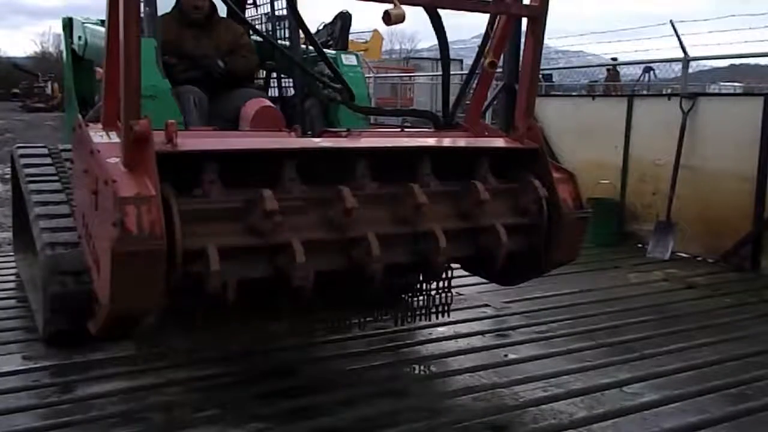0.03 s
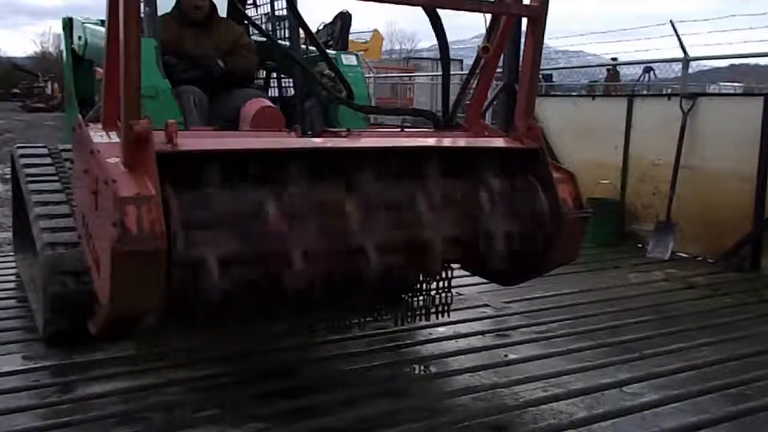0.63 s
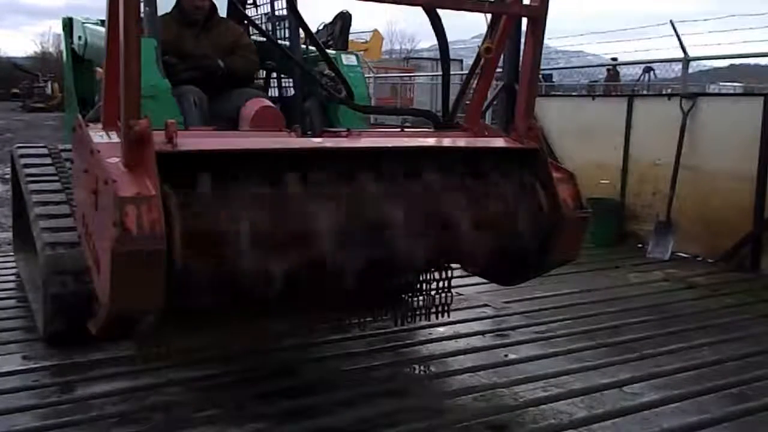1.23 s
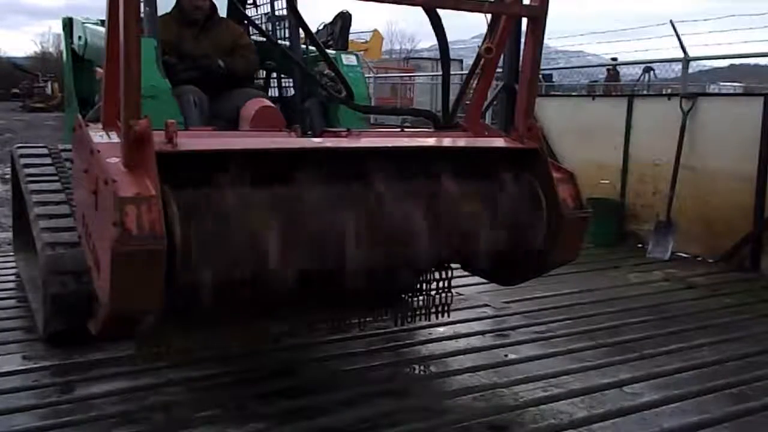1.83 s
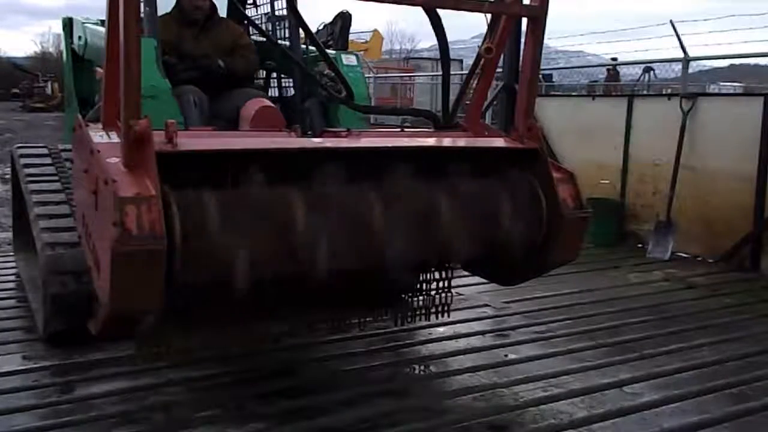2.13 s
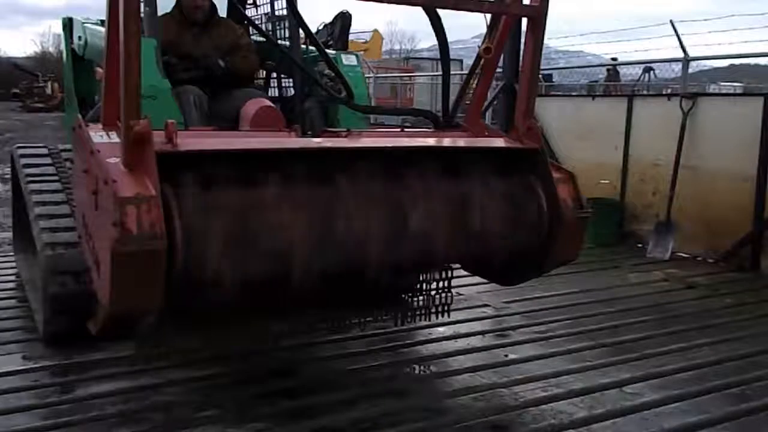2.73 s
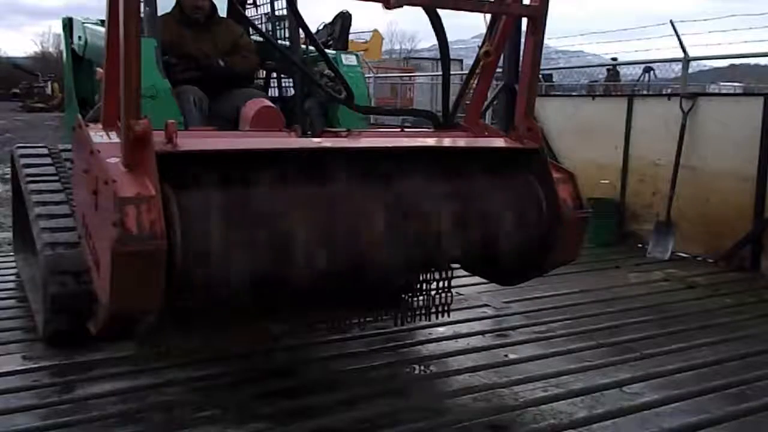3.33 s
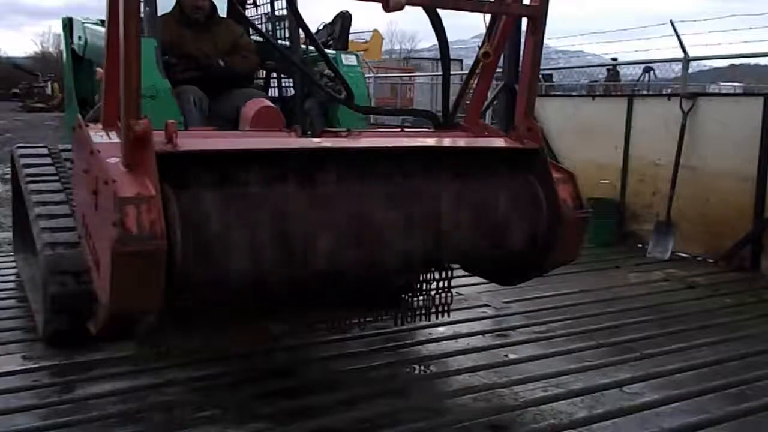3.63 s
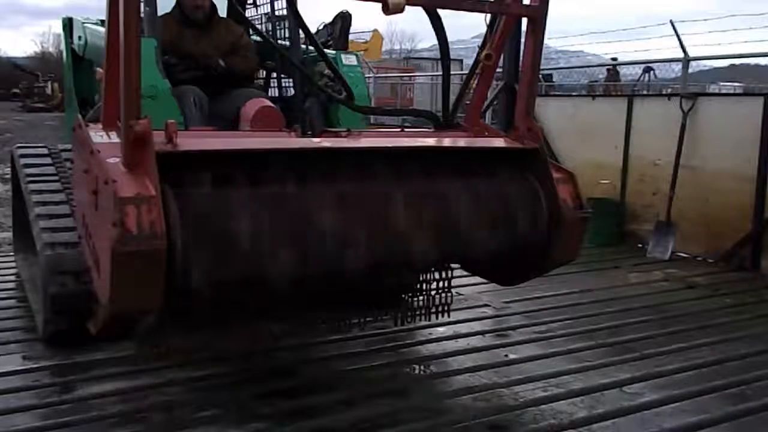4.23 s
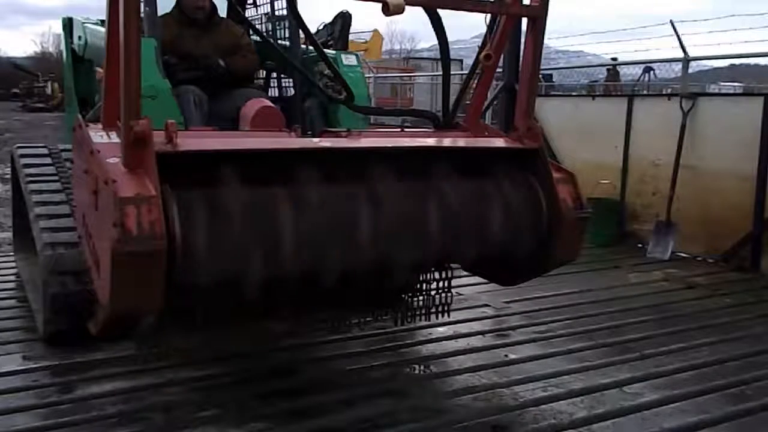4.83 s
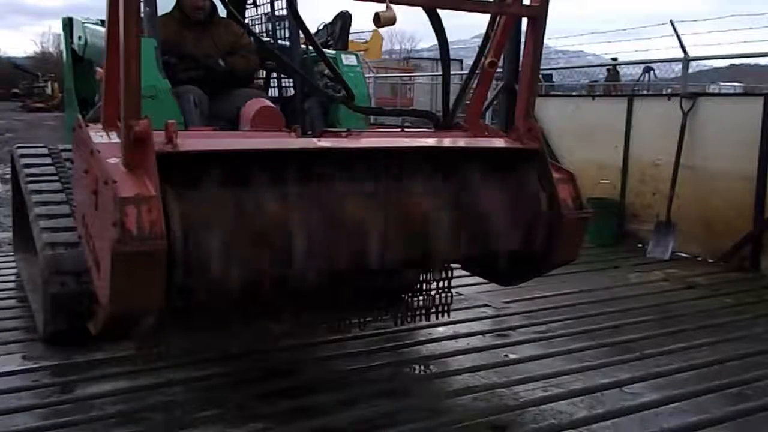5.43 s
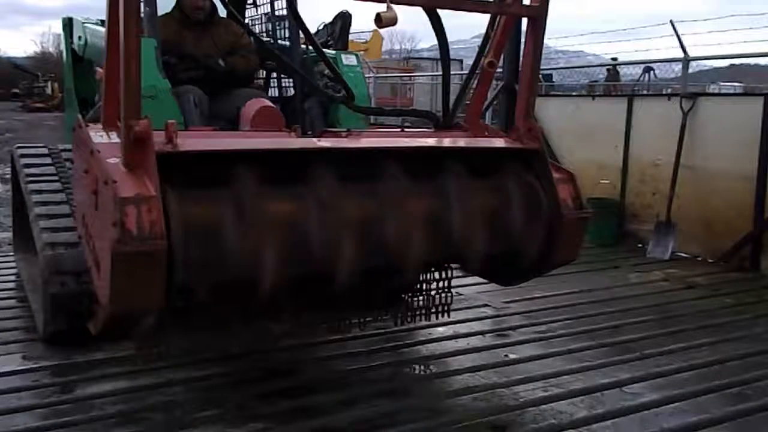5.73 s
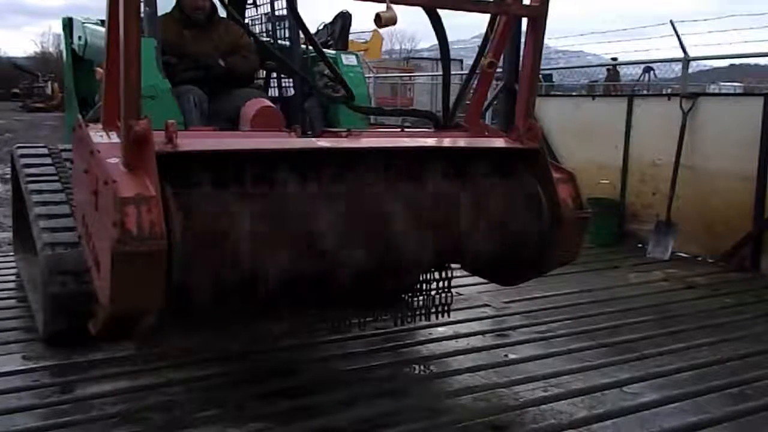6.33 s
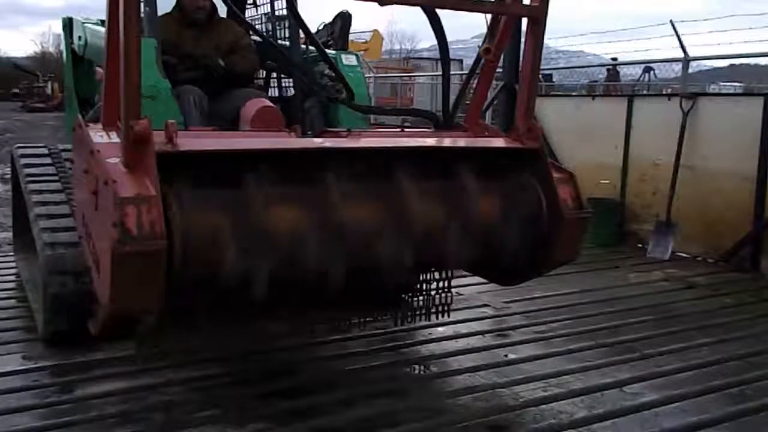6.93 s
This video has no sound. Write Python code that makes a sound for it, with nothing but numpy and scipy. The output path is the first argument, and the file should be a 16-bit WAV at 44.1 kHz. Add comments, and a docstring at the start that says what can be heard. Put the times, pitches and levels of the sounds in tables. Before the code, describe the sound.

A tracked machine's diesel runs continuously with metallic clatter and pump whine, an early hissing squeal, and slight pitch dips under load.

```python
"""A four-cylinder diesel on a tracked carrier runs near 1850 rpm and spins up a mulcher drum.
Under load the speed sags and the exhaust beats evenly; unloaded, the engine runs lumpy and knocks.
Injection clatter repeats every engine cycle and rings the steel covers, over a rush of air and oil.
The hydraulic pump sings along with the crank and groans as the pressure peaks. Early on, the drum's
oil valve spurts, squeals and rings its pipes. A faint sizzle sits on top of the whole sound."""
import sys
import numpy as np
from scipy import signal
from scipy.fft import rfft, irfft, next_fast_len
from scipy.io import wavfile
from scipy.ndimage import map_coordinates

SR = 44100
rng = np.random.default_rng(int(sys.argv[2]) if len(sys.argv) > 2 else 0)


def materialize(psi):
    """Save the field psi as 16-bit PCM at rate SR to the path in sys.argv[1].

    A 1-D psi becomes a single channel; in a 2-D psi each row is a channel.
    """
    bounded = np.clip(np.atleast_2d(psi).T, -1, 1)
    quanta = np.round(bounded * 32767).astype(np.int16)
    wavfile.write(sys.argv[1], SR, quanta)


N = 317079
TIME = np.arange(N) / SR

# knock of each cylinder, in firing order: (relative level [dB])
CYLINDER_KNOCKS = [-8, -1.5, -5, 2]
# the pump groans as oil pressure peaks against the drum: (time [s], length [s], whine boost [dB])
PUMP_GROANS = [(0.423, 0.045, 9), (6.762, 0.03, 11.5)]
# oil spurts through the closing valve, each brighter than the last:
# (time [s], half length [s], centre [Hz], width [Hz], level [dB])
OIL_SPURTS = [(.3, .03, 3200, 1500, -26.5), (.365, .026, 3600, 1400, -28.5),
              (.408, .032, 3700, 1800, -27.5)]


def undb(db):
    """Decibels to gain."""
    return np.exp(np.asarray(db) * np.log(10) / 20)


def walk(rate):
    """Smooth random drift of unit spread, changing about rate times a second."""
    size = next_fast_len(N, real=True)
    hz = np.fft.rfftfreq(size, 1 / SR)
    drift = irfft(rfft(rng.standard_normal(size)) * np.exp(-(hz / rate) ** 2), size)[:N]
    return drift / drift.std()


def filtered(x, response):
    """Pass a sound through a response given as a function of frequency."""
    size = next_fast_len(N + SR // 2)
    hz = np.fft.rfftfreq(size, 1 / SR) + 1e-3
    return irfft(rfft(x, size) * response(hz), size)[:N]


def on_log_axis(hz, points_hz, values):
    """Join spectrum points by straight lines on a log-frequency axis."""
    return np.interp(np.log(hz), np.log(points_hz), values)


def resonance(hz, centre_hz, width_hz):
    """Response of one resonance, gain 1 at its centre."""
    return 1 / (1 + 1j * (hz - centre_hz ** 2 / hz) / width_hz)


def hiss(response):
    """Noise of rms 1 coloured by a response."""
    noise = filtered(rng.standard_normal(N), response)
    return noise / noise.std()


def unit_treble(x):
    """Scale a sound so that its 1-6 kHz band has rms 1."""
    return x / filtered(x, lambda hz: (hz > 1000) & (hz < 6000)).std()


def hydraulic_load():
    """The drum is driven, nears its speed, runs free and is driven again."""
    # load changes: (time [s], ramp [s], new load [0 free, 1 full])
    load_changes = [(.275, .215, 1), (2.836, 1.183, .49), (5.238, .243, 0), (6.557, .29, 1)]
    load, before = np.zeros(N), 0
    for start, ramp, after in load_changes:
        load += (after - before) * np.clip((TIME - start) / ramp, 0, 1)
        before = after
    return load


def governor(load, free_hz=64.013, droop_hz=3.52, swings_per_s=1.72, settle_s=.135, fuel_lag_s=.037):
    """Firing rate droops with load and swings after each change; fuelling follows a little late."""
    idle_fuel, extra_fuel_per_hz = .031, .078  # steady full load takes a fuelling of 1
    swing = np.exp(-TIME / settle_s) * np.sin(2 * np.pi * swings_per_s * TIME)
    sag_hz = 5.78 * signal.fftconvolve(np.gradient(load), swing)[:N]
    firing_hz = free_hz - droop_hz * load ** 2 - sag_hz
    fuel = idle_fuel + (1 - idle_fuel) * load + extra_fuel_per_hz * load ** 2 * sag_hz
    return firing_hz, np.interp(TIME - fuel_lag_s, TIME, fuel)


def load_weights(fuel):
    """Crossfade between the full-load, half-load and free-running character."""
    balance = 2 * np.maximum(fuel, 0) - 1
    return np.maximum([balance, 1 - np.abs(balance), -balance], 0)


def sizzle(fuel, free_db=-56.2, loaded_change_db=-3.5, spurt_boost_db=3.5, flicker_db=1.5):
    """A thin, flickering sizzle high above the clatter, a little stronger while the valve spurts."""
    # noise bands: (centre [Hz], half width [Hz], relative level [dB])
    bands = [(7750, 500, 0), (9050, 330, -7)]
    noise = hiss(lambda hz: sum(undb(db) * np.exp(-((hz - centre) / half) ** 2)
                                for centre, half, db in bands))
    spurting = sum(np.exp(-((TIME - s) / half) ** 2) for s, half, *_ in OIL_SPURTS)
    level_db = free_db + loaded_change_db * np.minimum(fuel, 1) + spurt_boost_db * spurting
    return noise * undb(level_db + flicker_db * walk(60))


def oil_valve(squeal_hz=2945, squeal_db=-36, flow_db=-32, top_hz=5200, wander_rad=.59):
    """Oil squeezing through a narrow gap squeals and spurts, then rings the pipes as the drum spins up."""
    # resonances of the valve and its pipes: (centre [Hz], width [Hz], relative level [dB])
    pipe_modes = [(3265, 40, -1), (3470, 46, 0), (2190, 66, -5.5), (4400, 1200, -14)]
    start_s, end_s, spin_up_s = .33, .44, 2.1
    rise_db_per_s, release_db_per_s = 49, 301
    before, after = np.maximum(start_s - TIME, 0), np.maximum(TIME - end_s, 0)
    envelope = undb(squeal_db - rise_db_per_s * before - release_db_per_s * after)
    squeal = envelope * np.sqrt(2) * np.sin(2 * np.pi * squeal_hz * TIME + wander_rad * walk(30))
    muffle = lambda hz: 1 / (1 + (hz / top_hz) ** 20)
    spurts = np.zeros(N)
    for s, half, centre, width, db in OIL_SPURTS:
        burst = undb(db) * np.exp(-((TIME - s) / half) ** 2)
        spurts += burst * hiss(lambda hz: resonance(hz, centre, width) * muffle(hz))
    pipe_power = lambda hz: sum(np.abs(undb(db) * resonance(hz, centre, width)) ** 2
                                for centre, width, db in pipe_modes)
    pipes = hiss(lambda hz: muffle(hz) * np.sqrt(pipe_power(hz)))
    flow = np.interp(TIME, [start_s, end_s, end_s + spin_up_s], [0, 1, 0])
    return squeal + spurts + undb(flow_db) * flow * pipes


def pump(cycle, firing_hz, weights, strokes_per_cycle=27.26, groan_edge_s=.01, wander_rad=.18):
    """Pressure ripple of the engine-driven pump: a whine, its octave and a thin tone two octaves up."""
    # the tones slide through the machine's resonances: (firing rate [Hz], whine [dB], octave [dB])
    pump_response = [(58.7, -41, -36), (59.6, -30.5, -34), (60.5, -29.5, -30.8), (61, -31.5, -38),
                     (61.55, -24.5, -45), (62.1, -27.5, -40), (62.5, -37, -39), (63, -27.3, -40),
                     (64, -26.2, -34), (64.8, -31, -25.5)]
    # the thin top tone: (full load [dB], half load [dB], running free [dB])
    overtone_db = [-52, -45, -40]
    whine_flutter_db, octave_flutter_db = 1.5, 1.0
    rates_hz, *levels = np.transpose(pump_response)
    whine_db, octave_db = (np.interp(firing_hz, rates_hz, db) for db in levels)
    groan_db = sum(np.interp(TIME - s, [-groan_edge_s, 0, length, length + groan_edge_s], [0, db, db, 0])
                   for s, length, db in PUMP_GROANS)
    phase = 2 * np.pi * strokes_per_cycle * cycle + wander_rad * walk(35)
    whine = undb(whine_db + groan_db + whine_flutter_db * walk(33)) * np.sin(phase)
    octave = undb(octave_db + octave_flutter_db * walk(32)) * np.sin(2 * phase)
    overtone = (undb(overtone_db) @ weights) * np.sin(4 * phase)
    return np.sqrt(2) * (whine + octave + overtone)


def clatter_db(fuel, free_db=-22.5, loaded_change_db=-5.5, drift_db=.12):
    """Clatter and rush soften with fuelling, swell before each groan and dip now and then."""
    # brief dips in level: (time [s], fall [s], recovery [s], depth [dB])
    lulls = [(.381, .006, .035, -3), (3.06, .35, .35, -1.8), (6.072, .015, .055, -4.5),
             (6.525, .006, .04, -4), (6.709, .006, .055, -4), (6.81, .006, .035, -2.5),
             (7.11, .008, .03, -3.5)]
    peak_db, rise_s, cut_s, lead_s = 2, .13, .0073, .051
    swell_db = sum(np.interp(TIME - s + lead_s, [-rise_s, 0, cut_s], [0, peak_db, 0])
                   for s, _, _ in PUMP_GROANS)
    lull_db = sum(np.interp(TIME - s, [-fall, 0, recovery], [0, db, 0]) for s, fall, recovery, db in lulls)
    return free_db + loaded_change_db * np.minimum(fuel, 1) - drift_db * walk(8) + swell_db + lull_db


def knocks(cycle, decay_firings=.33, floor=1.84, scatter_db=2.0):
    """Envelope of the mechanical noise: each firing kicks it above a floor and dies before the next."""
    firing = len(CYLINDER_KNOCKS) * (cycle + 1)
    index = firing.astype(int)
    cylinder_db = np.array(CYLINDER_KNOCKS)[index % len(CYLINDER_KNOCKS)]
    strength = undb(cylinder_db + scatter_db * rng.standard_normal(1024)[index])
    return floor + strength * np.exp(-(firing % 1) / decay_firings)


def steel_covers(noise):
    """The engine's covers ring at their own pitches on top of the noise that shakes them."""
    # cover resonances: (centre [Hz], width [Hz], level relative to the noise [dB])
    cover_modes = [(1343, 24, -2), (1695, 12, 2), (2195, 60, 0), (3272, 16, 1.5), (3412, 12, 3),
                   (3457, 5, 13.5), (3492, 5, 13.5), (4370, 25, -2), (4900, 120, -7)]
    ring_power = lambda hz: sum(undb(db) ** 2 / (1 + (2 * (hz - centre) / width) ** 2)
                                for centre, width, db in cover_modes)
    return filtered(noise, lambda hz: np.sqrt(1 + ring_power(hz)))


def clatter_and_rush(cycle, weights, fuel, flutter_db=.71):
    """Injectors, valves and gears repeat one rattle each cycle; air and oil rush on underneath."""
    # share of the power that is clatter, the rest being rush: (frequency [Hz], share [0-1])
    clatter_share = [(100, 0), (400, 0.28), (800, 0), (1500, 0.57), (2400, 0.45), (3400, 0.02),
                     (6000, 0.15)]
    # relative tone colour of both: (frequency [Hz], full load [dB], half load [dB], running free [dB])
    colour = [(30, -73, -82.5, -94), (89, -62.5, -60, -64), (172, -57, -54, -50.5), (296, -57.5, -57, -56),
              (464, -58, -57.5, -50.5), (830, -58, -56.5, -53.5), (1080, -61, -60, -57.5),
              (1530, -62, -58.5, -55.5), (2200, -64.5, -61.5, -59), (3300, -61.5, -59, -57),
              (3510, -65, -64, -62.5), (5180, -71.5, -69.5, -67.5), (6340, -79, -78, -76.5),
              (6760, -106, -104.5, -106), (10100, -102, -100, -102)]
    cycle_samples = round(1 / np.mean(np.gradient(cycle)))
    loop = rng.standard_normal(cycle_samples)
    rattle = map_coordinates(loop, [(cycle % 1) * cycle_samples], order=3, mode="grid-wrap")
    share = lambda hz: np.clip(on_log_axis(hz, *np.transpose(clatter_share)), 0, 1)
    clatter = filtered(rattle, lambda hz: np.sqrt(share(hz)))
    rush = filtered(rng.standard_normal(N), lambda hz: np.sqrt(1 - share(hz)))
    ringing = steel_covers((clatter + rush) * knocks(cycle) * undb(flutter_db * walk(27)))
    points_hz, *curves = np.transpose(colour)
    load_layers = [unit_treble(filtered(ringing, lambda hz: undb(on_log_axis(hz, points_hz, db))))
                   for db in curves]
    return np.average(load_layers, axis=0, weights=weights) * undb(clatter_db(fuel))


def exhaust_drone(cycle, firing_hz, weights, waver=.25):
    """Exhaust pulses: multiples of four are the even firing, the rest one cylinder thumping harder."""
    # exhaust partials and, higher up, metallic gear overtones:
    # (multiple of the cycle rate, full load [dB], half load [dB], running free [dB])
    partials = [(4, -33, -37, -42), (8, -29, -24, -25), (10, -42, -40, -35), (11, -44, -39, -31),
                (12, -30, -36, -30), (13, -47, -42, -41), (14, -44, -48, -41), (15, -52, -48, -41),
                (16, -45, -56, -47), (17, -50, -49, -41), (18, -47, -43, -39), (19, -48, -47, -45),
                (20, -42, -48, -39), (22, -57, -42, -53), (24, -48, -42, -42), (26, -46, -42, -36),
                (28, -36, -45, -29), (29, -57, -39, -38), (30, -44, -38, -43), (31, -42, -44, -44),
                (32, -37, -34, -29), (33, -51, -45, -41), (34, -46, -42, -41), (35, -52, -45, -49),
                (36, -40, -41, -34), (37, -46, -40, -50), (38, -47, -56, -49), (39, -45, -54, -53),
                (40, -48, -37, -39), (42, -49, -39, -35), (43, -56, -45, -51), (44, -47, -51, -45),
                (45, -50, -39, -50), (46, -53, -44, -37), (47, -42, -43, -47), (49, -47, -53, -42),
                (50, -47, -48, -41), (51, -51, -42, -47), (53, -46, -55, -45), (56, -49, -51, -41),
                (60, -48, -57, -55), (64, -50, -51, -53), (68, -49, -41, -42), (75, -63, -44, -49),
                (76, -51, -53, -40), (80, -50, -58, -47), (84, -51, -43, -35), (86, -65, -49, -43),
                (88, -45, -42, -41), (89, -43, -44, -43), (91, -53, -43, -46), (92, -50, -44, -39),
                (94, -56, -43, -49), (95, -51, -46, -43), (96, -46, -56, -43), (98, -49, -58, -58),
                (101, -55, -46, -53), (103, -48, -49, -43), (104, -47, -46, -42), (105, -49, -48, -45),
                (108, -49, -52, -44), (112, -46, -45, -49), (140, -53, -46, -56)]
    thump_top, firing_top = 15, 20  # highest multiples that line up into pulses
    boom_multiple, boom_firing_hz, boom_width_hz, boom_db = 12, 59.3, 1, 3
    wavers = [walk(14) for _ in range(5)]
    # under load the cylinders share the work, and the single thump dissolves
    dissolve = weights[0] + .2 * weights[1]
    drone = np.zeros(N)
    for k, (multiple, *db) in enumerate(partials):
        # low partials line up into a thump; pipe and covers scatter the higher ones in time
        lag = rng.uniform(-.5, .52)
        if multiple % len(CYLINDER_KNOCKS) == 0 and multiple <= firing_top:
            lag = 0
        elif multiple <= thump_top:
            lag = lag * dissolve
        partial = np.cos(2 * np.pi * (multiple * cycle - lag))
        if multiple == boom_multiple:  # booms as the sagging speed brings it onto the exhaust's resonance
            partial *= undb(boom_db * np.exp(-((firing_hz - boom_firing_hz) / boom_width_hz) ** 2))
        # no two firings are alike, so the higher partials come and go
        depth = waver * min(multiple / firing_top / 2, 1)
        drone += partial * (1 + depth * wavers[k % len(wavers)]) * (undb(db) @ weights)
    return np.sqrt(2) * drone


def scene(first_thump_s=.021):
    """One crankshaft drives drone, clatter and pump; the load sets their speed and balance."""
    firing_hz, fuel = governor(hydraulic_load())
    cycle_hz = firing_hz / len(CYLINDER_KNOCKS)
    # four-stroke cycles elapsed; uneven combustion shakes the crank a little
    cycle = np.cumsum(cycle_hz) / SR - first_thump_s * cycle_hz[0] + .00027 * walk(29)
    weights = load_weights(fuel)
    drone = exhaust_drone(cycle, firing_hz, weights)
    whine = pump(cycle, firing_hz, weights)
    valve_and_high_sizzle = oil_valve() + sizzle(fuel)
    clatter = clatter_and_rush(cycle, weights, fuel)
    return (drone + clatter + whine + valve_and_high_sizzle)[None]


def record(dry, low_cut_hz=18, top_hz=9500):
    """The small microphone sheds the deepest rumble, and a steep low-pass takes off the top."""
    thinned = signal.sosfilt(signal.butter(2, low_cut_hz, "highpass", fs=SR, output="sos"), dry)
    return signal.sosfilt(signal.ellip(10, .2, 80, top_hz, fs=SR, output="sos"), thinned)


dry = scene()
out = record(dry)
materialize(out)
```